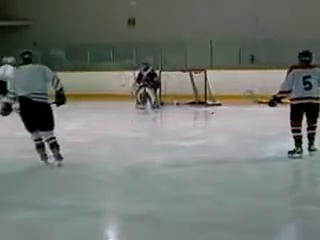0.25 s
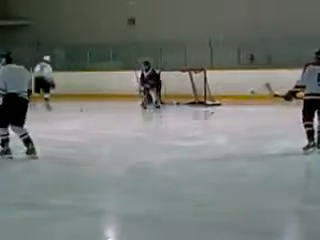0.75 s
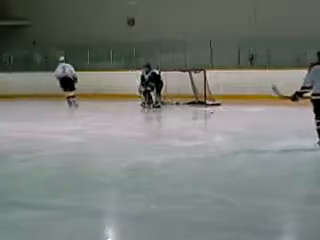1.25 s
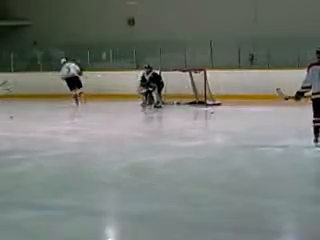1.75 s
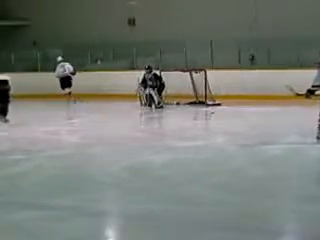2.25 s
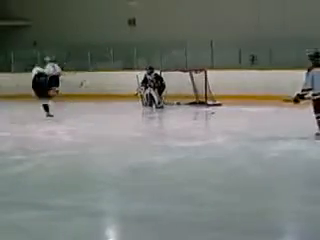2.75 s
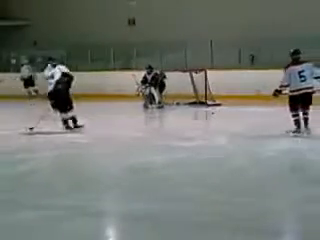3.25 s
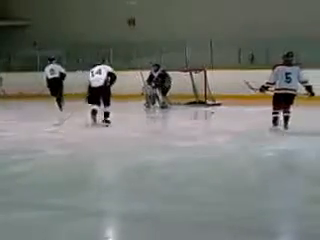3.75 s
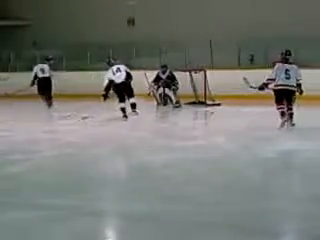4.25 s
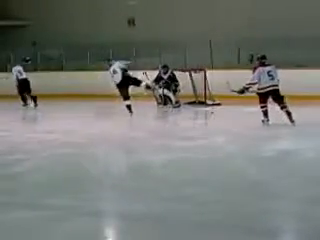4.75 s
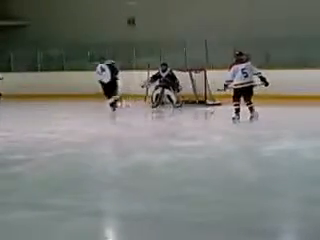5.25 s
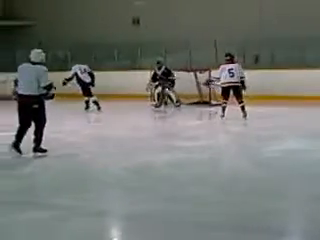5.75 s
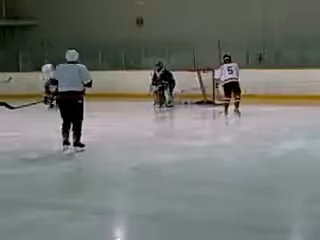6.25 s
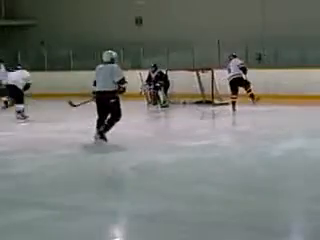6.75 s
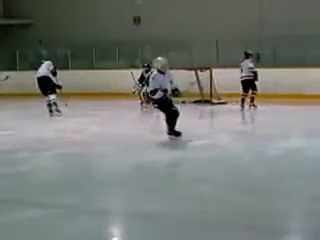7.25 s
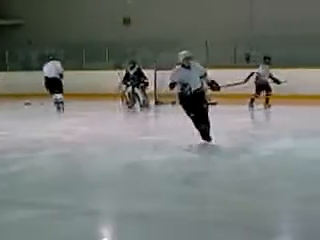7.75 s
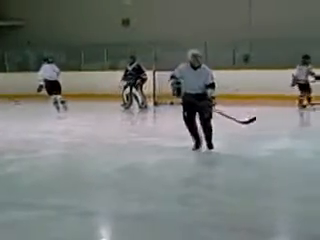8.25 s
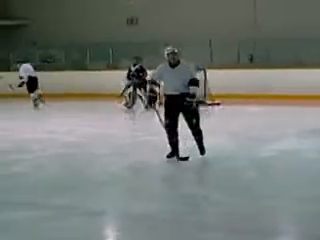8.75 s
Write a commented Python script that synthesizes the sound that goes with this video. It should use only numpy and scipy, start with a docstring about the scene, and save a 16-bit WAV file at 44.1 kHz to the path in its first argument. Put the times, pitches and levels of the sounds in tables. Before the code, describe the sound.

Hockey skates carve the ice in a large indoor rink, a gritty, spraying scrape that swells with the strides and sometimes squeaks. Sticks and pucks clack sharply throughout, and a few thuds come off the boards. The skating is loudest about halfway, and the goal frame pings faintly near the end. Blows echo over a steady hiss and thin lamp buzz, heard through a bright camera microphone that overloads on the hardest hits.

```python
"""Skate blades carving the ice at hockey practice, in a large indoor rink. The ice breaks under the
edges in dense ticks, throwing spray, and now and then an edge bites or sings. Sticks and pucks clack,
the boards thud and the steel goal frame pings. Clacks and thuds ring on far out in the hall; behind
them the lamps buzz at twice the mains rate over a steady hiss. Heard through one bright mono camera
microphone that overloads on the loudest blows."""
import sys
import numpy as np
from scipy import signal
from scipy.io import wavfile
from scipy.ndimage import uniform_filter1d

SR = 44100
rng = np.random.default_rng(int(sys.argv[2]) if len(sys.argv) > 2 else 0)


def wav_out(sig):
    """Save sig, one row per channel (or a flat mono array), as 16-bit PCM at SR to the path in sys.argv[1]."""
    wavfile.write(sys.argv[1], SR, np.round(np.clip(np.atleast_2d(sig).T, -1, 1) * 32767).astype(np.int16))


N = 397341

# strides at the microphone: t/s, carving level/dB, spray over carving/dB, grind over carving/dB
STRIDES = [(0.0, -14.5, 1, -10), (.25, -21, 5, -5.5), (.55, -23, 2, -5.5), (.9, -18, 0.5, -6),
           (1.08, -18.5, 0, -3), (1.2, -22, 0, -3.5), (1.36, -23.5, -0.5, -2.5), (1.45, -21.5, 3, -2),
           (1.7, -24, 3.5, -1.5), (2.2, -27.5, 3, -3), (2.57, -28, 4.5, -3), (2.66, -21, 1.5, -6.5),
           (2.98, -18, 0, -3.5), (3.36, -24.5, 2.5, -4), (3.45, -21, 4, -3), (3.72, -26.5, 1.5, -1),
           (3.81, -21.5, 5.5, -1.5), (3.89, -21.5, -0.5, -7.5), (3.99, -18, 0.5, -5),
           (4.12, -20.5, 1.5, -5.5), (4.19, -9.5, 0, -11), (4.31, -15, -1.5, -11), (4.39, -13, 1.5, -10.5),
           (4.5, -13, -3.5, -14), (4.64, -16, -3, -12.5), (4.872, -19.5, 1, -6), (4.89, -13, 3.5, -7.5),
           (5.17, -20, -3, -8), (5.42, -19.5, 0.5, -4.5), (5.6, -24.5, 2.5, -3), (5.95, -25.5, 1, -5.5),
           (6.2, -21.5, 3, -5), (6.68, -25.5, -2, -4), (6.77, -19.5, -4, -8), (7.2, -23, 1, -2),
           (7.3, -20, 3.5, -4), (7.5, -28.5, 2.5, 1), (7.54, -21.5, 1.5, -3), (7.97, -28.5, 1, -3.5),
           (8.1, -28, 4.5, -3), (8.4, -28, 7, -5.5), (8.65, -23, 2.5, -2.5), (9.01, -32, 3, -3)]
# rumble of the ice under the skaters: t/s, level/dB
RUMBLE_LEVELS = [(0.0, -25.5), (.5, -34.5), (.9, -32.5), (1.2, -35.5), (2.2, -37.5), (2.56, -38.5),
                 (2.7, -34), (3.0, -34), (3.46, -29), (3.7, -36), (3.81, -30.5), (4.12, -37), (4.16, -19.5),
                 (4.3, -26.5), (4.49, -22), (4.64, -30.5), (4.85, -32), (4.9, -23.5), (5.17, -33),
                 (5.4, -32.5), (5.6, -39), (6.65, -35.5), (6.8, -37), (7.2, -36), (7.3, -29.5), (7.49, -34),
                 (7.53, -29.5), (7.95, -38.5), (8.2, -38), (8.55, -33.5), (8.75, -31.5), (9.01, -42.5)]
# the four sounds of a blade on ice: f/Hz, relative level/dB
CARVE_SPECTRUM = [(800, -30), (1800, -13.5), (2700, -1), (3600, -2.5), (4800, -2), (5800, -3), (8000, -33),
                  (12000, -77)]
SPRAY_SPECTRUM = [(2500, -24), (4500, -2), (5500, -2.5), (6700, 6), (7500, -0.5), (8500, -8.5),
                  (10000, -29), (12000, -52)]
GRIND_SPECTRUM = [(300, -44), (800, -12.5), (1200, -4), (1800, 0), (2500, -2), (3200, -8.5), (6000, -45)]
RUMBLE_SPECTRUM = [(20, -9), (60, -15.5), (150, -9), (300, -7.5), (600, -0.5), (900, 1), (1300, 1.5),
                   (3000, -57)]
# an edge bites or sings: t/s, length/s, first f/Hz, last f/Hz, resonance width/Hz, level/dB
EDGE_SQUEALS = [(0.041, 0.048, 3800, 3600, 1800, -13), (0.599, 0.17, 2920, 2720, 300, -20.5),
                (.74, .45, 4250, 4260, 250, -28), (1.044, 0.12, 2580, 2550, 500, -27),
                (1.464, 0.063, 4320, 4230, 380, -17.5), (2.741, 0.021, 6000, 6150, 1190, -10),
                (4.152, 0.063, 4570, 5600, 1500, -10.5), (4.295, 0.087, 3480, 3520, 299, -18),
                (4.36, 0.045, 5570, 6040, 1500, -11), (5.348, 0.34, 1394, 1390, 121, -33)]
# stick and puck blows: t/s, near-peak level/dB, wood f/Hz, contact/s, tilt/(dB/octave), room send/dB
STICK_BLOWS = [(.0044, -2.5, 6330, .007, 3, -7), (0.0636, -4.5, 3770, 0.0062, 2, -5),
               (.189, -8.5, 6410, .0045, 1, 2), (.879, -7.5, 6060, .0026, -2, -9),
               (.991, -5, 6600, 0.0054, -4, 0), (1.0491, -8, 2900, 0.0051, -3.5, -3.5),
               (1.3666, 1, 2660, 0.0068, 1.5, -6.5), (1.471, -9, 4270, 0.0031, 1, -7),
               (1.491, -7.5, 4640, .0093, -1.5, -5), (2.1292, -4.5, 6300, 0.0018, 8, -12),
               (2.587, 3, 6760, 0.014, -0.5, -8.5), (2.664, -8, 4100, .002, -5, -7),
               (2.68, -5, 1990, 0.0018, -7.5, -9), (2.7439, -6, 6350, 0.0054, -1, -1),
               (2.784, -10, 6600, 0.0056, -3, -5), (2.9994, -9, 2090, 0.0054, 2, -9),
               (3.287, -13, 1490, .0018, -6, -6), (3.376, 2.5, 2630, 0.0078, -5.5, -13),
               (3.432, -8.5, 4000, 0.0066, -2, -1.5), (3.4667, -8, 1820, .002, -4, -8),
               (3.799, -13, 6280, .0054, 6, -5), (4.068, -3, 3950, 0.0031, -2, -2.5),
               (4.1065, -7, 4000, 0.0042, -1.5, -1), (4.3649, -3, 5470, 0.006, 0, -2),
               (4.4882, 0.5, 3680, 0.0054, 1, -5), (4.6133, -11, 4160, 0.0017, -1.5, 3),
               (4.8095, -1.5, 3160, 0.003, 2, -4), (4.849, -6, 3380, 0.0027, 6, -9),
               (4.8779, 3.5, 7200, 0.0093, -1.5, -7), (4.9299, 4, 4200, 0.012, -1.8, -11.5),
               (4.9533, 0.5, 6500, .004, 9, -10), (5.0106, -6, 6730, .003, 5, -13),
               (5.035, -17, 6670, .0023, 1, -9), (5.971, -8.5, 995, .0033, 3.5, -6),
               (6.0134, -13, 7500, .003, 6, 1), (6.084, -10, 7440, .0045, 13, -1),
               (6.543, -10, 3630, .003, -1, -11), (6.7022, -4.5, 2800, 0.0035, -3, -12),
               (6.709, -0.5, 2500, 0.0038, -3, -11), (6.769, 2, 4660, .006, .4, -13),
               (6.7887, -7, 6900, .002, 0, -4), (6.804, -6.5, 4620, .0015, -2.5, -1),
               (6.8247, 1, 4580, 0.0014, -1, -16), (6.969, -10, 1490, .002, -5.5, -9),
               (7.222, 1.8, 4400, 0.007, -1, -18), (7.2428, -4.5, 4320, .004, 2.5, -4),
               (7.2794, 4, 6700, 0.0055, -0.5, -12), (7.5234, -11, 2000, 0.0032, -7, -5),
               (7.5746, -22, 6900, .0019, 2, -8), (7.828, -9.5, 1600, 0.0036, 2.5, -4),
               (7.855, -9.5, 1720, 0.002, 0, -6), (8.006, -14, 7200, 0.0044, 2.5, 3),
               (8.2152, -2, 5370, 0.0049, -1.6, -4.5)]
# crack of a blow, before tilt and wood ring: f/Hz, relative level/dB
CRACK_SPECTRUM = [(100, -31.5), (500, -13.5), (1200, 1), (2500, 4), (5000, 4), (7000, 1), (8500, -9),
                  (12000, -31.5)]
# hits on the boards: t/s, peak level/dB, panel f/Hz, t60 of the shove/s
BOARD_HITS = [(.01, -18.5, 258, .08), (3.051, -29, 342, .08), (4.141, -8, 252, 0.072),
              (4.16, -13.5, 428, 0.24), (4.879, -28, 317, 0.049), (4.935, -20.5, 122, .1),
              (7.518, -24.5, 128, 0.12), (8.215, -22, 485, .04)]
# panel modes: ratio to the panel pitch, gain/dB
BOARD_MODES = [(.55, -10), (1, 2.5), (1.35, -2), (1.8, -20), (2.3, -15), (2.9, -20), (4.3, -11)]
# knocks on the goal frame: t/s, level/dB, hardness/(dB/octave)
GOAL_KNOCKS = [(8.535, -37, 1.5), (8.705, -32, 5.5)]
# steel tube modes: f/Hz, relative level/dB, t60/s
GOAL_MODES = [(532, 3.5, 1.15), (770, 3, .7), (1020, -7, .6), (1116, 4, .5), (1400, -2, 0.45),
              (1470, -2, .4), (1870, -2, .3), (2320, 6, .12), (2770, 3, .12), (3336, 1, .1)]
# paths off ice, glass and boards: delay/s, gain/dB
REFLECTIONS = [(.005, -4), (0.011, -1), (0.021, -2), (.036, -2.5), (0.061, -12)]
# decay of the hall: f/Hz, t60/s
HALL_DECAY = [(100, 3.6), (500, 1.62), (2000, 1.46), (5000, 0.95), (9000, 0.94)]
# ceiling that the ordinary lamp harmonics scatter below: f/Hz, rms level/dB
LAMP_SPECTRUM = [(2400, -52), (3800, -48), (5000, -42), (6200, -37), (7000, -40.5), (8000, -42),
                 (9000, -53.5), (10900, -62)]
# the clearest lamp harmonics: {harmonic number: rms level/dB}
CLEAR_HARMONICS = {32: -40.1, 34: -40.1, 49: -40, 50: -40.2, 54: -34.2, 55: -30.7, 56: -34.9, 57: -42, 58:
                   -42, 59: -37.7, 60: -34.5, 61: -32.5, 62: -36.8, 63: -39.2, 64: -38, 65: -38.1, 66:
                   -39.3, 67: -44.2, 69: -45.3, 73: -47.1}
# background hiss: f/Hz, relative level/dB
HISS_SPECTRUM = [(12, -52), (20, -19), (69, -35), (177, -13.5), (287, -20.5), (679, -30), (1450, 1),
                 (3190, -4.5), (4110, 3.5), (5300, -17), (6660, -14), (7560, 5), (8580, -22), (11200, -19),
                 (18900, -120)]


def skates():
    """Blades break the ice: carving with a drifting ring, fine spray, coarse grind and low rumble."""
    ring_hz, ring_width_hz, ring_height, drift_hz = 3680, 490, .45, 150
    times, carve_db, spray_db, grind_db = np.transpose(STRIDES)
    t = np.arange(N) / SR
    stride = lambda over_db: amp(np.interp(t, times, carve_db + over_db))
    ring_path_hz = ring_hz + drift_hz * wander(400, points=4)

    def blade_ring(hz, s):
        centre_hz = np.interp(s, np.linspace(0, N / SR, 400), ring_path_hz)
        return 1 + ring_height / (1 + ((hz - centre_hz) / ring_width_hz) ** 2)

    edge = ice_chips(per_s=9000, spread_db=.72, judder_db=.64)
    snow = ice_chips(per_s=12000, spread_db=1.07, judder_db=.45)
    carve = filtered(edge, lambda hz, s: amp(at_hz(CARVE_SPECTRUM, hz)) * blade_ring(hz, s), size=512)
    spray = coloured(snow, SPRAY_SPECTRUM, size=512) * stride(spray_db)
    grind = coloured(snow, GRIND_SPECTRUM, size=512) * stride(grind_db)
    rumble = coloured(edge, RUMBLE_SPECTRUM, size=2048) * amp(np.interp(t, *np.transpose(RUMBLE_LEVELS)))
    return unit_rms(carve) * stride(0) + spray + grind + rumble


def ice_chips(per_s, spread_db, judder_db):
    """Ice breaking under a blade: dense ticks of uneven size, with the edge juddering."""
    size = amp(spread_db * np.minimum(rng.exponential(1, N), 5))
    breaks = rng.random(N) < per_s / SR
    ticks = size * breaks * rng.standard_normal(N)
    return unit_rms(ticks * amp(judder_db * wander(N, points=220)))


def edge_squeals():
    """An edge bites or sings: rubbing noise passes twice through a gliding resonance."""
    out, noise = np.zeros(N), rng.standard_normal((len(EDGE_SQUEALS), SR // 2))
    for (s, length, first_hz, last_hz, width_hz, db), rub in zip(EDGE_SQUEALS, noise):
        hz = np.linspace(first_hz, last_hz, round(length * SR))
        tone = resonate(resonate(rub[:len(hz)], hz, width_hz), hz, width_hz)
        add(out, s, amp(db) * unit_rms(tone) * np.hanning(len(hz)) ** .5)
    return out


def stick_clacks():
    """Cracks rattle through each contact and ring the wood. Returns the near sound and the hall feed."""
    wood_db, overtone_db, overtone_ratio, width_octaves = 8, 3.1, 1.52, .23
    attack_s, release_t60 = .00018, .016
    direct, to_walls, to_hall = np.zeros((3, N))
    t, hz = np.arange(3000) / SR, np.fft.rfftfreq(2048, 1 / SR)
    bump = lambda centre_hz: 1 / (1 + (np.log2((hz + 1) / centre_hz) / width_octaves) ** 2)
    noise = rng.standard_normal((len(STICK_BLOWS), len(t)))
    for (s, db, wood_hz, contact_s, tilt_db, room_db), rattle in zip(STICK_BLOWS, noise):
        ring_db = wood_db * bump(wood_hz) + overtone_db * bump(overtone_ratio * wood_hz)
        crack_db = at_hz(CRACK_SPECTRUM, hz) + tilt_db * np.log2((hz + 300) / 3500)
        response = minimum_phase(crack_db + ring_db)
        envelope = (1 - np.exp(-t / attack_s)) * amp(-60 * np.maximum(t - contact_s, 0) / release_t60)
        clack = signal.fftconvolve(rattle * envelope, response)[:len(t)]
        clack *= amp(db) / np.sort(abs(clack))[-12]  # a few spikes overshoot the level
        add(direct, s, clack)
        add(to_walls, s, amp(room_db) * clack)
        # the hall blurs the rattle into one smooth colour
        add(to_hall, s, amp(room_db) * np.linalg.norm(clack) * response / np.linalg.norm(response))
    return direct + early_reflections(to_walls), to_hall


def board_thuds():
    """A puck or body against the boards: a knock and a rough shove shake a few broad panel modes."""
    out, t = np.zeros(N), np.arange(SR // 4) / SR
    knock = 2.35 * t / .0013 * np.exp(-t / .00068)
    noise = rng.standard_normal((len(BOARD_HITS), len(t)))
    for (s, db, hz, t60), shove in zip(BOARD_HITS, noise):
        force = knock + shove * amp(-60 * t / t60)
        panel = sum(amp(mode_db) * resonate(force, np.full(len(t), hz * ratio), width_hz=35 * ratio)
                    for ratio, mode_db in BOARD_MODES)
        add(out, s, amp(db) * panel / abs(panel).max())
    return out


def goal_pings():
    """Steel tube modes, fluttering as the frame rocks; a harder knock wakes the upper ones."""
    out, t = np.zeros(N), np.arange(SR) / SR
    attack = 1 - np.exp(-t / .0033)
    for s, db, hardness in GOAL_KNOCKS:
        for hz, mode_db, t60 in GOAL_MODES:
            ring_db = db + mode_db + hardness * np.log2(hz / 1000) - 60 * t / t60
            flutter = 1 + .5 * wander(SR, points=1200)
            add(out, s, amp(ring_db) * attack * np.sin(2 * np.pi * hz * t) * flutter)
    return out


def early_reflections(x):
    """Ice, glass and boards return delayed copies to the microphone."""
    out = np.zeros(N)
    for delay_s, db in REFLECTIONS:
        add(out, delay_s, amp(db) * x)
    return out


def hall_tail(x):
    """The far reaches of the rink ring on, treble dying first."""
    gap_s, build_s, t = .02, .078, np.arange(2 * SR) / SR
    taps = rng.standard_normal(len(t)) * np.clip((t - gap_s) / build_s, 0, 1)
    tail = filtered(taps, lambda hz, s: amp(-60 * s / at_hz(HALL_DECAY, hz)), size=512)
    return signal.fftconvolve(x, tail / np.linalg.norm(tail))[:N]


def lamp_buzz():
    """Harmonics of twice the mains rate, each wavering a little on its way through the hall."""
    buzz_hz, scatter_db, waver_db = 119.962, 3, 1.24
    out, t, knots = np.zeros(N), np.arange(N) / SR, np.linspace(0, N / SR, 200)
    for harmonic in range(20, 92):
        hz = harmonic * buzz_hz
        ordinary_db = at_hz(LAMP_SPECTRUM, hz) - scatter_db * rng.exponential()
        db = CLEAR_HARMONICS.get(harmonic, ordinary_db) + waver_db * wander(200, points=4)
        out += np.sqrt(2) * np.interp(t, knots, amp(db)) * np.sin(2 * np.pi * (hz * t + rng.random()))
    return out


def hiss(level_db=-29):
    """Steady wash of distant skating, ventilation and the microphone itself."""
    return amp(level_db) * coloured(rng.standard_normal(N), HISS_SPECTRUM, size=2048)


def amp(db):
    return 10 ** (np.asarray(db) / 20)


def unit_rms(x):
    return x / np.sqrt(np.mean(x ** 2) + 1e-20)


def at_hz(curve, hz):
    """Value of a curve at hz, interpolated over log frequency."""
    f, value = np.transpose(curve)
    return np.interp(np.log(hz + 1), np.log(f + 1), value)


def add(mix, s, sound):
    part = mix[round(s * SR):][:len(sound)]
    part += sound[:len(part)]


def wander(count, points):
    """Slow random drift of rms 1."""
    return unit_rms(uniform_filter1d(uniform_filter1d(rng.standard_normal(count), points), points))


def filtered(x, gain, size):
    """Multiplies the short-time spectra of x by gain(f/Hz, t/s)."""
    frames = dict(fs=SR, nperseg=size, noverlap=size * 3 // 4)
    hz, t, spectra = signal.stft(x, **frames)
    return signal.istft(spectra * gain(hz[:, None], t), **frames)[1][:len(x)]


def coloured(x, spectrum, size):
    """Shapes x by a steady spectrum, to rms 1."""
    return unit_rms(filtered(x, lambda hz, s: amp(at_hz(spectrum, hz)), size))


def minimum_phase(gain_db):
    """Short response that starts at once, from a one-sided spectrum."""
    log_gain = np.log(amp(np.concatenate([gain_db, gain_db[-2:0:-1]])))
    return np.fft.ifft(np.exp(np.conj(signal.hilbert(log_gain)))).real[:len(gain_db) // 2]


def resonate(x, hz, width_hz):
    """Resonance along the curve hz: shifts it down to zero, smooths, and shifts back."""
    turn = np.exp(2j * np.pi * np.cumsum(hz) / SR)
    pole = np.exp(-np.pi * width_hz / SR)
    return 2 * (turn * signal.lfilter([1 - pole], [1, -pole], x / turn)).real


def scene():
    """The rink as it reaches the microphone position."""
    clacks, clacks_to_hall = stick_clacks()
    thuds = board_thuds()
    blows = clacks + thuds + goal_pings() + hall_tail(amp(2) * clacks_to_hall + amp(-5) * thuds)
    mono = skates() + edge_squeals() + blows + lamp_buzz() + hiss()
    return np.array([mono, mono])


def record(dry):
    """The camera microphone: its top end, overload with a sharp knee, then the band limit."""
    mic_top_hz, band_limit_hz, knee = 11500, 15800, 9
    taps = lambda hz: signal.firwin(511, hz, window=("kaiser", 9), fs=SR)
    low_pass = lambda x, hz: signal.oaconvolve(x, taps(hz), "same")
    mic = low_pass(dry.mean(0), mic_top_hz)
    clipped = mic / (1 + abs(mic) ** knee) ** (1 / knee)
    # overload pushes the amplifier off centre for a moment: a low thump under loud blows
    thump = .49 * uniform_filter1d(abs(mic - clipped), size=150)
    mono = low_pass(clipped - thump, band_limit_hz)
    return np.array([mono, mono])


dry = scene()
out = record(dry)
wav_out(out)
```